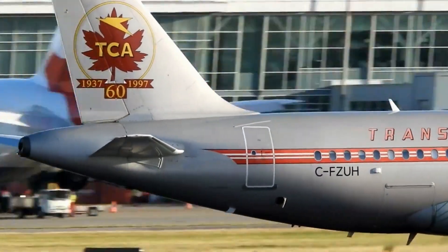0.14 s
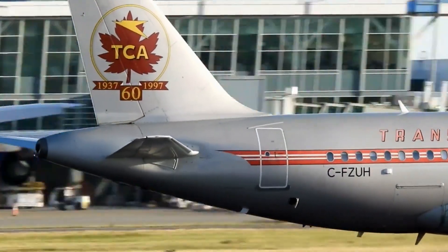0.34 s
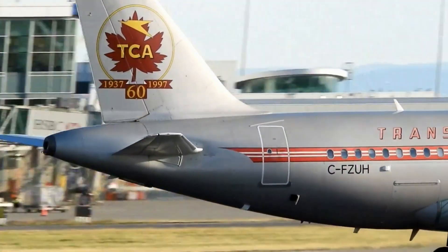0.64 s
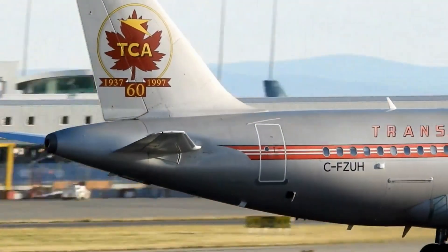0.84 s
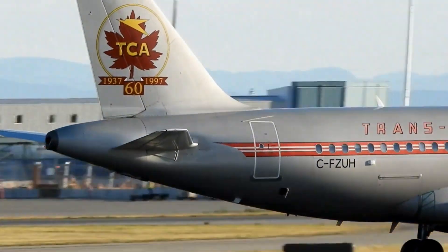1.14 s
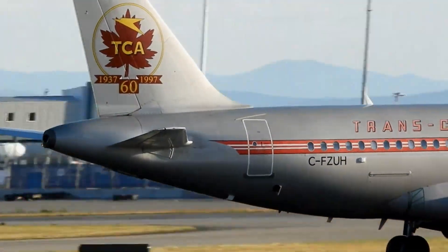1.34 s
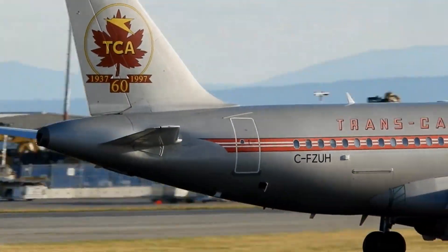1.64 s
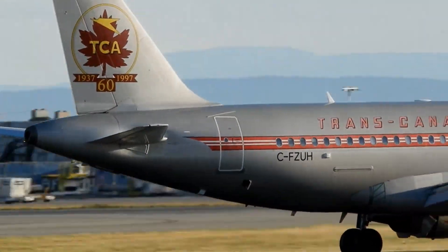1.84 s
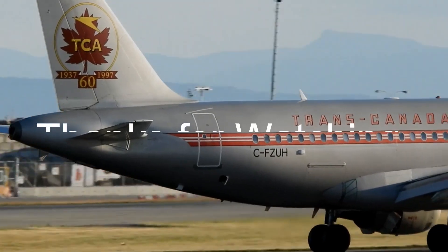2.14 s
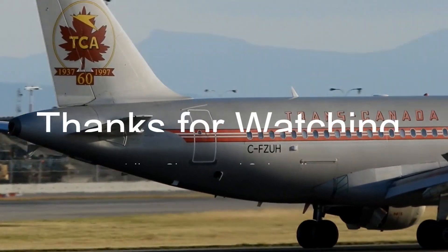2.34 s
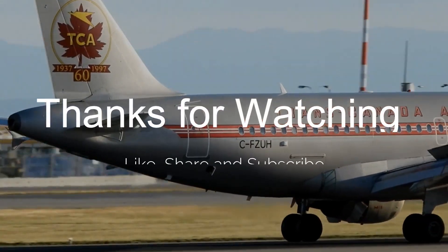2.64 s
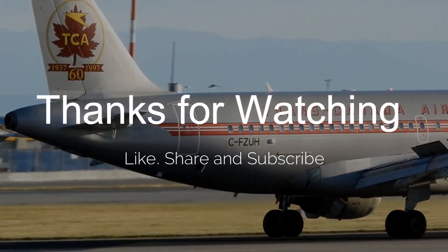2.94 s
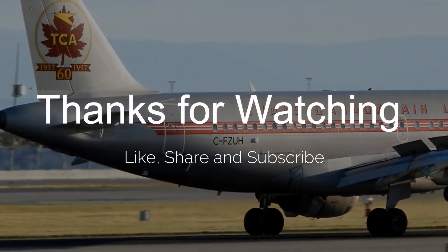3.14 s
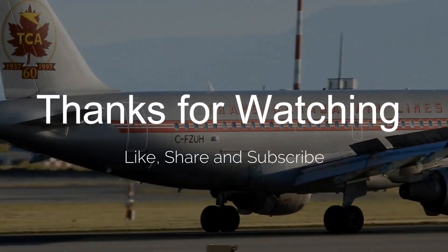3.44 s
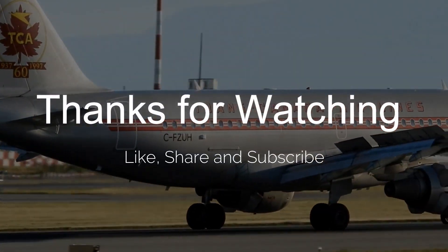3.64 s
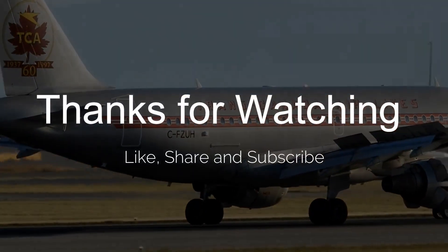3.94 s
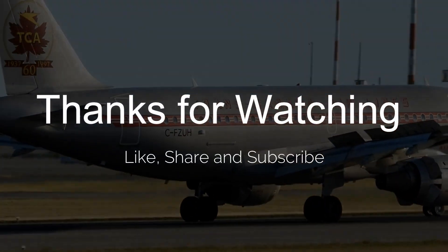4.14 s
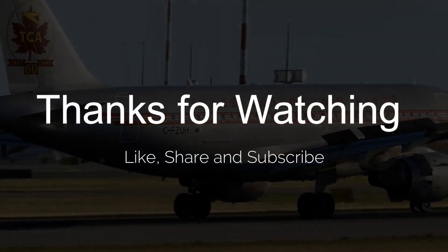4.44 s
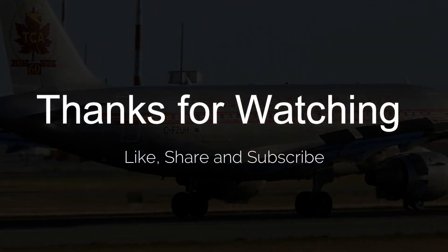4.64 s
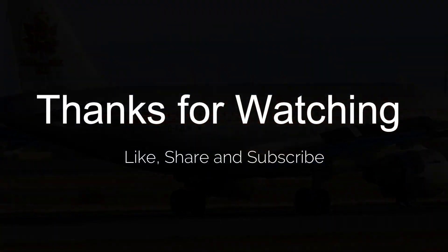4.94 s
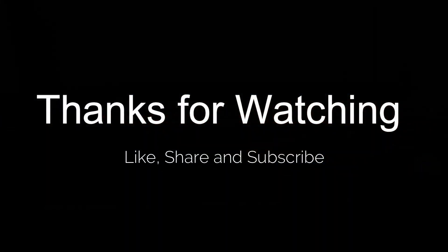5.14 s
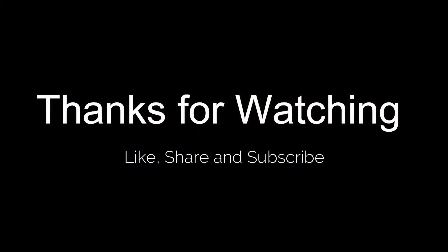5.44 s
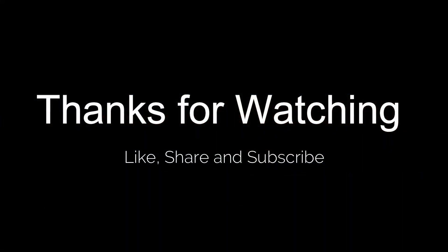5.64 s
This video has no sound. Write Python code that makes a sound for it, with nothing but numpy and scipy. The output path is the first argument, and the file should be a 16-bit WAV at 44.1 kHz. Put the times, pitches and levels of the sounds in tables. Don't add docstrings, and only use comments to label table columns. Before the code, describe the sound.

A distant airliner's crackling reverse-thrust roar rolls along a runway over a low drone, a small bird whistles to the right, then everything fades out.

```python
import sys
import numpy as np
from scipy import signal
from scipy.fft import rfft, irfft
from scipy.io import wavfile
from scipy.ndimage import uniform_filter1d, map_coordinates

SR = 44100
rng = np.random.default_rng(int(sys.argv[2]) if len(sys.argv) > 2 else 0)


def master_out(mix):
    frames = np.transpose(np.atleast_2d(mix))
    ceiling = np.clip(frames, -1, 1)
    pcm = np.round(ceiling * 32767).astype(np.int16)
    wavfile.write(sys.argv[1], SR, pcm)


def gain_from_db(level_db):
    decades = np.asarray(level_db, float) / 20
    return 10 ** decades


N = 255322
T = np.arange(N) / SR
HZ = np.maximum(np.fft.rfftfreq(N, 1 / SR), 1.)
FRAME, HOP = 2048, 256


def curve(table):
    s, *columns = np.transpose(table)
    return [np.interp(T, s, c) for c in columns]


def shape(table, hz=HZ):
    f, db = np.transpose(table)
    return np.interp(np.log(hz), np.log(f), db)


def unit(x):
    return x / np.sqrt(np.mean(x ** 2))


def bump(x, centre, half):
    return np.exp(-((x - centre) / half) ** 2)


def patches(s, at, half, db, across):
    return (db * across) @ bump(s, at[:, None], half[:, None])


def walk(rate, count=N, per_s=SR):
    k = max(int(per_s / rate), 1)
    held = np.repeat(rng.standard_normal(count // k + 1), k)
    return unit(uniform_filter1d(uniform_filter1d(held, k), k)[:count])


def noise(gain_db):
    return rfft(rng.standard_normal(N)) * gain_from_db(gain_db)


def fade():
    start_s, end_s = 2.994, 5.379
    return np.clip((end_s - T) / (end_s - start_s), 0, 1)


def breeze():
    # t/s, half length/s, level over calm/dB
    gusts = [
        (.1, 0.34, 4),
        (0.508, 0.046, 14),
        (.6, .2, 7.5),
        (3.0, 0.22, 4),
        (3.773, 0.08, 8),
        (4.402, 1, 9.5),
    ]
    calm_db = -49
    ring_db = -14 * np.log10(1 + ((HZ - 160) / 45) ** 2)
    ring_db -= 8 * np.log10(1 + (90 / HZ) ** 4)
    buffets = [unit(irfft(noise(ring_db), N)) * gain_from_db(5.7 * walk(19)) for _ in range(2)]
    gust_db = sum(db * bump(T, at, half) for at, half, db in gusts)
    return np.array(buffets) * gain_from_db(calm_db + gust_db)


def bird():
    # syllable, top t/s, top f/Hz, level/dB, sung from and until (t/s about
    calls = [
        ("trill", 1.785, 8850, -64.5, -.119, .028),
        ("spike", 2.682, 6950, -39.5, -.011, .024),
        ("pip", 2.878, 3750, -38, -.02, .009),
        ("hook", 3.011, 6050, -34.5, -.056, .02),
        ("arch", 3.165, 4900, -34.5, -.011, .01),
        ("spike", 3.22, 7000, -38, -.03, .026),
        ("pip", 3.412, 3850, -41.5, -.02, .009),
        ("hook", 3.531, 5900, -38, -.055, .031),
        ("arch", 3.682, 4850, -37.5, -.014, .01),
        ("spike", 3.739, 7200, -39.5, -.021, .025),
    ]
    syllables = { "pip": [(-.02, .9, -5), (-.011, .97, 0), (0, 1, 0), (.009, .99, -6)],
                 "hook": [(-.056, .75, -4), (-.04, .69, -1), (-.027, .66, -6), (-.018, .7, -4),
                 (-.008, .84, -1), (0, 1, -2), (.004, .9, -10), (.008, .8, -1), (.016, .68, -1),
                 (.031, .57, -6)], "arch": [(-.022, .62, -12), (-.011, .84, -3), (-.006, .95, -1),
                 (0, 1, 0), (.01, .88, -4.5)], "spike": [(-.03, .43, 2), (-.021, .575, 1), (-.014, .68, 3),
                 (-.007, .76, -1), (0, 1, -8), (.006, .85, 1), (.013, .79, 1), (.026, .72, -7)],
                 "trill": [(-.119, .938, -7), (-.085, .944, -3), (-.065, .966, -3), (-.05, .932, -4),
                 (-.023, .96, -1), (0, 1, 0), (.015, .972, 1), (.028, .966, 0)], }
    pan_db, pan_hz, pan_power, lag_s = -6.0, 5000, 1.5, -.000044
    out = np.zeros((2, N))
    for name, top_s, top_hz, top_db, first, last in calls:
        s, share, db = np.transpose(syllables[name])
        s, hz, db = s + top_s, share * top_hz, db + top_db
        span = slice(int((s[0] - .01) * SR), int((s[-1] + .01) * SR))
        aside = name != "trill"
        for side, sign in enumerate((1. * aside, -1. * aside)):
            t = T[span] - sign * lag_s / 2
            inside_s = np.minimum(t - top_s - first, top_s + last - t)
            edge = np.clip(inside_s / 0.0033, 0, 1)
            glide_hz = uniform_filter1d(np.interp(t, s, hz), size=90)
            phase = 2 * np.pi * np.cumsum(glide_hz) / SR
            phase -= np.pi * sign * lag_s * hz[0]
            side_db = db + sign * pan_db / 2 * (hz / pan_hz) ** pan_power
            out[side, span] += edge * gain_from_db(np.interp(t, s, side_db)) * np.sin(phase)
    ground_echo = 0.28 * np.roll(out, 170, axis=1)
    flutter_db = 1.2 * walk(260)
    return np.sqrt(2) * gain_from_db(1.8 + flutter_db) * (out + ground_echo)


def rotor(ratio, level_db, wander_hz, flutter_db, second_db):
    shaft_hz, early_hz, settle_s = 159.2, 5, 1.5
    pitch_hz = ratio * (shaft_hz + early_hz * bump(T, 0, settle_s)) + wander_hz * walk(9)
    phase = 2 * np.pi * np.cumsum(pitch_hz) / SR
    octave = gain_from_db(second_db + 7.1 * walk(5.0)) * np.sin(2 * phase)
    return np.sqrt(2) * gain_from_db(level_db + flutter_db * walk(14)) * (np.sin(phase) + octave)


def rotors():
    # t/s, level/dB
    drone = [(0, -25), (0.08, -20), (0.24, -23), (0.43, -28), (0.52, -47), (0.7, -37.5), (0.8, -31),
             (1.43, -37), (1.58, -37), (1.98, -35.5), (2.1, -30.5), (2.8, -31), (3.15, -34), (3.66, -31),
             (3.84, -44), (4.0, -37), (4.5, -36), (5.32, -42)]
    drone_db = curve(drone)[0]
    shaft = rotor(1, drone_db, 0.54, 0.58, -15.0)
    core = rotor(.416, -33 + 0.68 * drone_db, 1.8, 2.5, -23.5)
    return shaft + core


def puffs():
    # t/s, peak level/dB, f/Hz
    focused = [(0.068, -16.5, 638), (0.198, -16, 807), (0.695, -18, 678), (1.18, -16, 783),
               (1.24, -11.5, 670), (1.299, -15, 747), (1.399, -9, 762), (1.576, -15, 711),
               (1.627, -19, 651), (1.69, -14, 764), (1.791, -28, 766), (1.947, -13.5, 719),
               (1.991, -10.5, 689), (2.039, -23, 736), (2.121, -24, 790), (2.314, -31, 617),
               (2.507, -12, 782), (2.611, -14, 690), (2.712, -10, 690), (2.806, -26, 690),
               (3.187, -11, 730), (3.256, -12, 754), (3.694, -25, 730), (3.956, -18, 709)]
    gain_db, rise_s, half_s = -4, .0025, .0028
    out = np.zeros(N)
    for (at, db, hz), turn in zip(focused, rng.random(len(focused))):
        span = slice(int((at - .02) * SR), int((at + .03) * SR))
        ringing = np.sin(2 * np.pi * (hz * T[span] + turn))
        out[span] += gain_from_db(db + gain_db) * bump(T[span], at + rise_s, half_s) * ringing
    return out


def notches(hz, s):
    dips = [(425, 110, -14, 431, 150, -14.5), (550, 68, -9, 500, 94, -11.5),
            (935.5, 227, -19.5, 919, 294, -18.5), (1570, 350, -7.5, 1650, 650, -5),
            (2037, 290, -8, 2020, 330, -5.5), (2687, 400, -15, 2730, 430, -17),
            (2800, 79, -8, 2400, 130, -2.5), (3230, 530, -4.5, 3100, 190, -9),
            (3970, 260, -12, 3500, 520, 1), (4680, 290, -6.5, 8300, 900, -5.5),
            (6520, 300, -7.5, 6700, 350, -2.5), (7100, 340, 0, 6950, 730, -5),
            (7600, 110, -7, 10000, 270, -13.5)]
    turn_from_s, turn_until_s = 2.4, 3.9
    turn = np.clip((s - turn_from_s) / (turn_until_s - turn_from_s), 0, 1)
    total = 0
    for row in np.array(dips):
        f, w, db = row[:3, None] + turn * (row[3:, None] - row[:3, None])
        tremble = walk(5.6, count=len(s), per_s=SR / HOP)
        f = f * (1 + 0.014 * tremble)
        db = db * np.clip(1 + 0.064 * tremble[::-1], .3, 1.6)
        total = total + db / (1 + (2 * (hz[:, None] - f) / w) ** 2) ** 2
    return total


def reflections(hz, s):
    # t/s, half length/s, centre f/Hz, half width/Hz, level/dB
    pans = [(.2, 0.3, 685, 90, -5.5), (.2, .6, 880, 60, 3.5), (.3, .6, 923, 50, 8.5), (.3, .5, 526, 40, 2),
            (.3, .5, 2980, 150, -3.5), (.3, .5, 6570, 200, 3.5), (.3, .5, 7250, 200, 1.5),
            (1.7, .9, 433, 40, -2.5), (1.7, .9, 960, 50, -2), (1.7, .9, 2090, 80, -0.5),
            (1.2, 1.2, 2840, 45, -3.5), (.13, 0.094, 5480, 60, -10), (.15, .05, 4780, 60, -8.5),
            (1.7, .9, 4890, 150, -2.5), (1.7, .9, 5850, 200, -1), (1.7, .9, 6600, 150, 2.5),
            (1.7, .9, 7000, 150, -4.5), (3.1, 0.38, 2680, 100, 4), (3.1, .6, 2490, 100, 0.5),
            (3.1, .6, 3080, 150, 4), (4.4, .7, 900, 40, 1.5), (4.4, .7, 960, 40, -2.5),
            (4.4, .7, 1650, 100, -1.5), (4.4, .7, 2600, 80, -9), (4.4, .7, 2750, 80, 3),
            (4.4, 0.77, 3890, 150, -8), (4.4, .7, 4780, 150, -4.5), (4.4, .7, 6300, 300, -3),
            (4.4, .7, 7150, 200, 1)]
    at, half, centre, width, db = np.transpose(pans)
    return patches(s, at, half, db, bump(hz[:, None], centre, width))


def refraction(hz, s):
    # t/s, half length/s, centre f/Hz, level/dB
    lenses = [(0.0, 0.064, 892, -6), (0.037, 0.075, 189, 0), (0.585, 0.66, 471, 3), (0.59, 0.31, 1580, 3.5),
              (0.855, 0.23, 241, 9), (1.634, 0.18, 205.6, -6), (1.775, 0.17, 463, 1),
              (1.826, 0.22, 1182, -2), (2.753, 0.18, 1350, -4.5), (3.05, 0.094, 3230, -4.5),
              (4.113, 0.24, 435, -4.5), (4.25, 0.18, 204, -2), (5.019, 0.19, 250.6, -5),
              (5.307, 0.07, 433, 0.5), (0.192, 0.05, 1238, 3), (0.21, 0.042, 780, 0.5),
              (0.365, 0.086, 224.7, 5), (0.814, 0.048, 520, 4.5), (0.936, 0.07, 479, -1.5),
              (1.277, 0.048, 1586, 0.5), (1.286, 0.19, 130, -4), (1.35, 0.14, 330, 4.5),
              (1.503, .07, 900, -2.5), (1.78, 0.12, 250, 2), (1.976, .06, 900, -3), (2.12, 0.056, 332, 0.5),
              (2.1, 0.079, 700, 0), (2.205, 0.12, 3930, 3), (2.22, .06, 480, -1.5), (2.393, .12, 746, -2),
              (2.896, 0.13, 200, 4), (3.323, 0.12, 845, -0.5), (3.71, 0.096, 900, 2),
              (3.852, 0.026, 605, 0), (4.154, 0.054, 330, 5.5), (4.28, 0.035, 753, 4.5),
              (4.456, 0.061, 1208, -3.5), (4.622, 0.035, 843, 9.5), (5.107, 0.05, 597, -3),
              (5.22, .05, 596, 3), (.33, .1, 700, 4.5), (.55, .08, 550, -1.5), (1.3, 0.13, 517, -5),
              (2.2, 0.102, 280, 0.5), (2.78, 0.038, 550, 4.5), (2.92, 0.08, 397, -5),
              (3.3, 0.19, 3440, -2.5), (4.45, 0.11, 370, -4), (4.7, 0.085, 2510, -1.5),
              (1.98, 0.056, 5000, 5)]
    # t/s, half length/s, centre f/Hz, level/dB
    stills = [
        (.16, .07, 2810, -10),
        (.42, .04, 2880, -6.5),
        (1.02, .06, 2750, -5.5),
        (1.29, .08, 2740, -13.5),
        (1.43, .03, 2760, -4.5),
        (1.72, .03, 2760, -5),
        (1.95, 0.056, 2800, 0.5),
    ]
    at, half, centre, db = np.transpose(lenses)
    octaves = np.log2(hz[:, None] / centre)
    lens_db = patches(s, at, half, db, bump(octaves, 0, 0.54))
    at, half, centre, db = np.transpose(stills)
    return lens_db + patches(s, at, half, db, bump(hz[:, None], centre, 80))


def scintillation(hz, s):
    eddies = [walk(14, count=len(s), per_s=SR / HOP)]
    for _ in range(47):
        eddies.append(0.65 * eddies[-1] + 0.79 * walk(15, count=len(s), per_s=SR / HOP))
    place = np.interp(np.log(hz), np.log([40, 10000]), [0, 47])
    where = np.meshgrid(place, np.arange(len(s)), indexing="ij")
    depth_db = shape([(200, 0.69), (1000, 1.1), (5000, 0.49)], hz)[:, None]
    flicker_db = depth_db * map_coordinates(np.array(eddies), where, order=1)
    streaks = rng.standard_normal(flicker_db.shape)
    streaks = uniform_filter1d(streaks, size=3, axis=0)
    streaks = uniform_filter1d(streaks, size=9, axis=1)
    return flicker_db + 2.5 * unit(streaks)


def roar():
    # t/s, level/dB, tilt above the knee/dB per octave (clear air is brighter)
    swells = [(0.14, -22, 0.1), (0.28, -25.5, 3), (0.44, -26.5, 4), (0.87, -30, 0.5), (1.03, -29, 3),
              (1.25, -23.5, -1.13), (1.81, -26, -0.5), (1.96, -25, 0.4), (2.48, -25, 1), (2.69, -26, -0.7),
              (3.36, -26, -0.93), (3.57, -29.5, 0), (3.91, -26.5, -1), (4.16, -25, 0.5), (4.3, -22.5, 0.5),
              (4.61, -26.5, 2.25), (4.91, -26.5, 0.1), (5.32, -31, 0)]
    # f/Hz, level/dB per Hz
    colour = [(25, -34.5), (60, -26.5), (95, -40.5), (150, -3.5), (195, -2.5), (250, -7.5), (330, 1),
              (520, -2.5), (780, 2.5), (1250, -6), (2300, -12.5), (3500, -15.5), (5000, -22), (6600, -28),
              (8000, -49.5)]
    # f/Hz, level/dB per Hz
    scattered = [(100, -35.5), (300, -25), (570, -25.5), (750, -22.5), (1700, -21.5), (2600, -22.5),
                 (2790, -24), (3000, -23.5), (4300, -23.5), (6200, -29), (8000, -49)]
    # f/Hz, left minus right level/dB
    shade = [(1800, 0), (2450, -0.5), (2850, 0.5), (3300, -0.5), (4000, -4), (4750, -5.5), (5600, 0.5),
             (6300, -7), (7000, -3.5), (7400, -16.5), (8600, -1.5)]
    # t/s, length/s, level/dB
    cracks = [(0.102, 0.0072, -0.5), (0.71, 0.0079, 0.5), (1.192, 0.0077, 3.5), (1.262, 0.01, 3.5),
              (1.32, 0.038, 2), (1.41, 0.0053, 2.5), (3.226, 0.0066, 3), (3.258, 0.0036, -2),
              (3.735, 0.0096, 1.5), (3.806, 0.0047, 0), (4.304, 0.017, 0)]
    knee_hz, tilt_octaves, lead_s = 1000, 2.2, .000008
    hz, s, (direct, *spread) = signal.stft(
        rng.standard_normal((3, N)), SR, nperseg=FRAME, noverlap=FRAME - HOP)
    hz = np.maximum(hz, 1.)

    level_db, tilt = curve(swells)
    octaves_up = np.clip(np.log2(hz / knee_hz), 0, tilt_octaves)
    air_db = np.outer(octaves_up, np.interp(s, T, tilt))
    air_db += refraction(hz, s) + scintillation(hz, s)
    air_db -= 40 * np.log2(np.maximum(hz / 8000, 1))[:, None]

    direct = direct * gain_from_db(shape(colour, hz)[:, None] + notches(hz, s) + reflections(hz, s))
    lead = np.exp(1j * np.pi * lead_s * hz)[:, None]
    shade_db = shape(shade, hz)[:, None]
    scatter_gain = gain_from_db(shape(scattered, hz)[:, None] - 2.5)
    ports = []
    for sign, scatter in zip((1, -1), spread):
        coherent = direct * lead ** sign * gain_from_db(sign * shade_db / 2)
        ports.append(coherent + scatter * scatter_gain)
    out = signal.istft(np.array(ports) * gain_from_db(air_db), SR, nperseg=FRAME, noverlap=FRAME - HOP)[1]
    out = out[:, :N]

    body = irfft(rfft(out[0]) * (HZ > 550) * (HZ < 900), N)
    crack_db = sum(db * bump(T, at, half) for at, half, db in cracks)
    return out / np.std(body) * gain_from_db(level_db + 0.39 * walk(29.91) + crack_db)


def scene():
    engines = roar() + rotors()
    return (engines + breeze()) * fade() + bird() + puffs()


def low_pass(x):
    return signal.sosfilt(signal.butter(12, 15720, fs=SR, output="sos"), x)


def record(dry):
    # f/Hz, level/dB per Hz
    hiss_colour = [(7000, -6), (8500, -5), (10000, -10), (12500, -12), (13000, -18.5), (15000, -13),
                   (15150, -32), (15700, -32)]
    hiss_db = -59.5
    low_cut_db = -10 * np.log10(1 + (5000 / HZ) ** 4)
    hiss = np.array([unit(irfft(noise(shape(hiss_colour) + low_cut_db), N)) for _ in range(2)])
    return low_pass(dry + hiss * gain_from_db(hiss_db) * fade() ** 0.99)


dry = scene()
out = record(dry)
master_out(out)
```